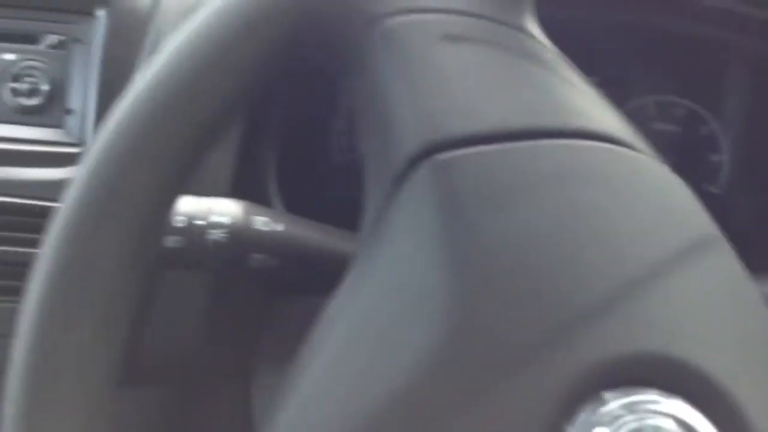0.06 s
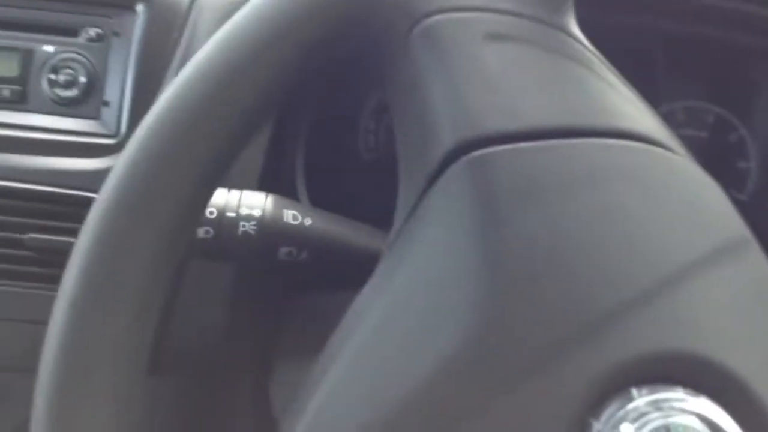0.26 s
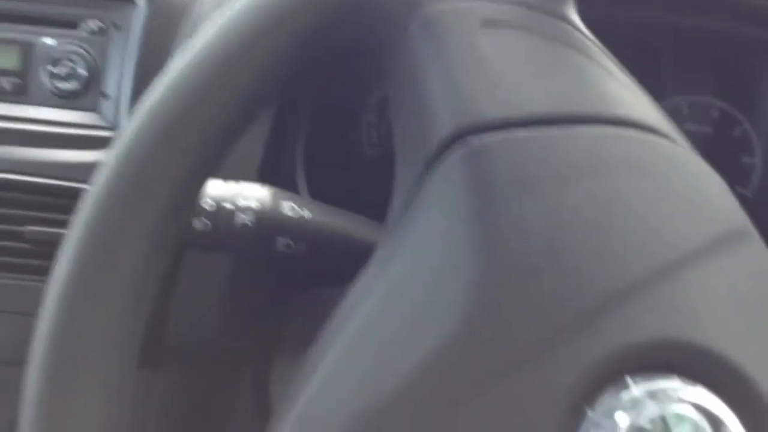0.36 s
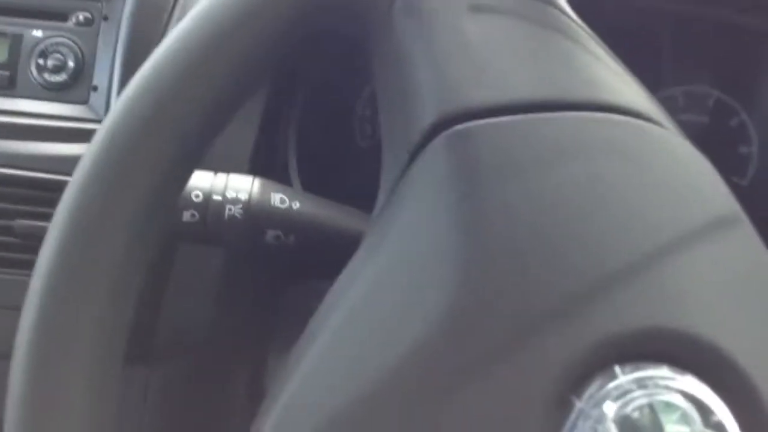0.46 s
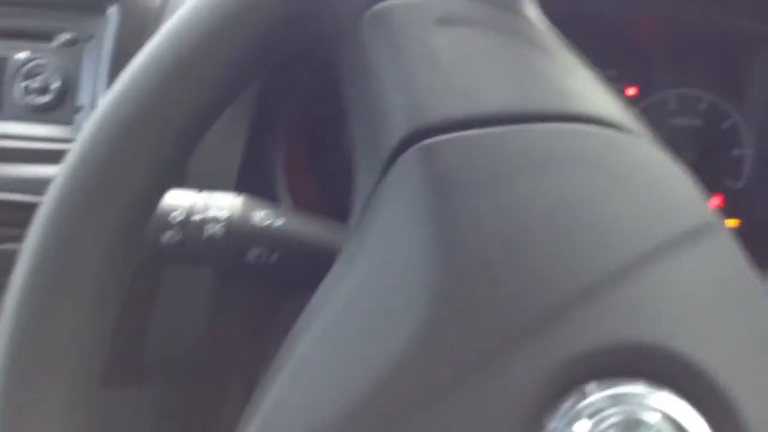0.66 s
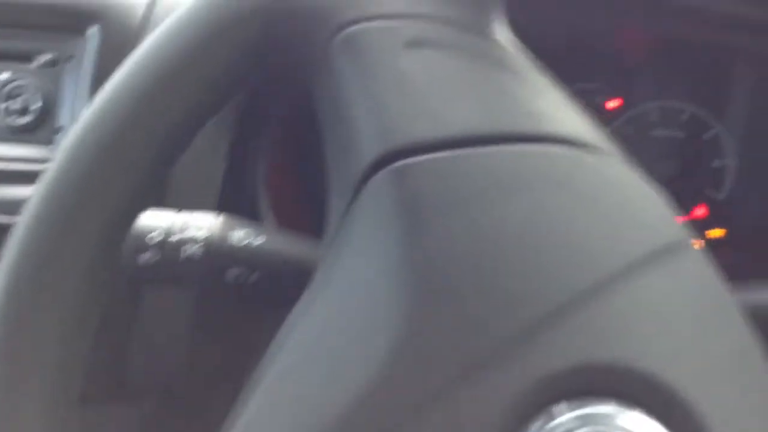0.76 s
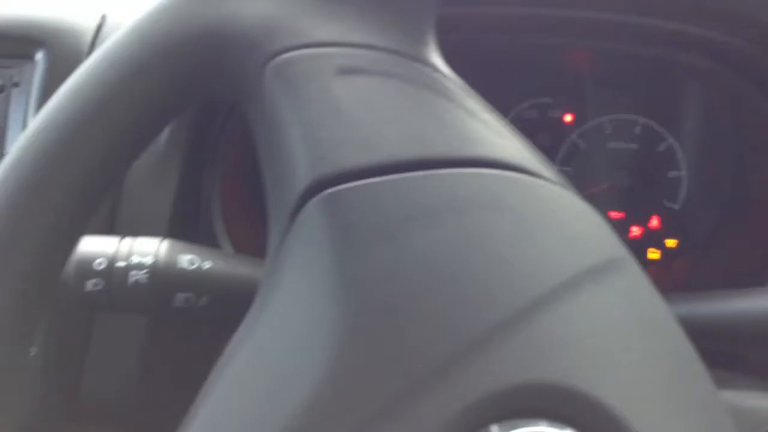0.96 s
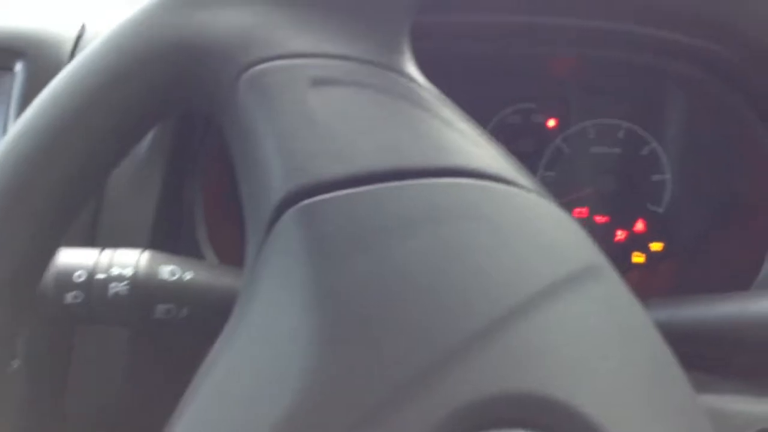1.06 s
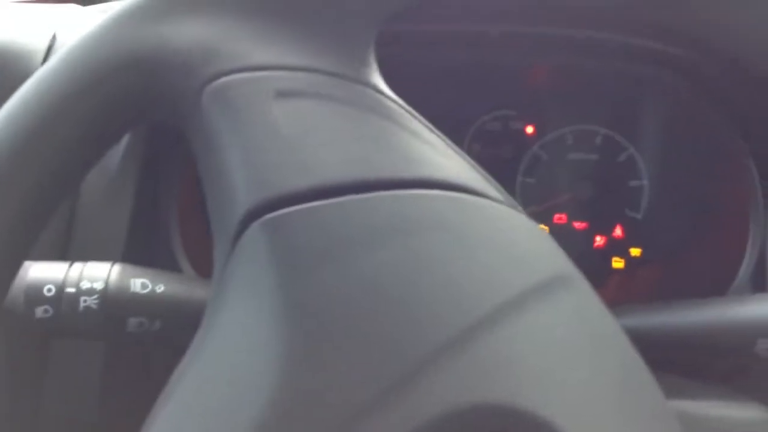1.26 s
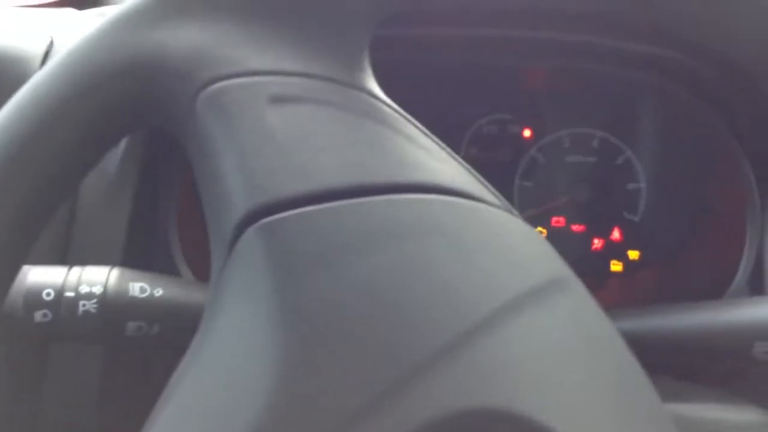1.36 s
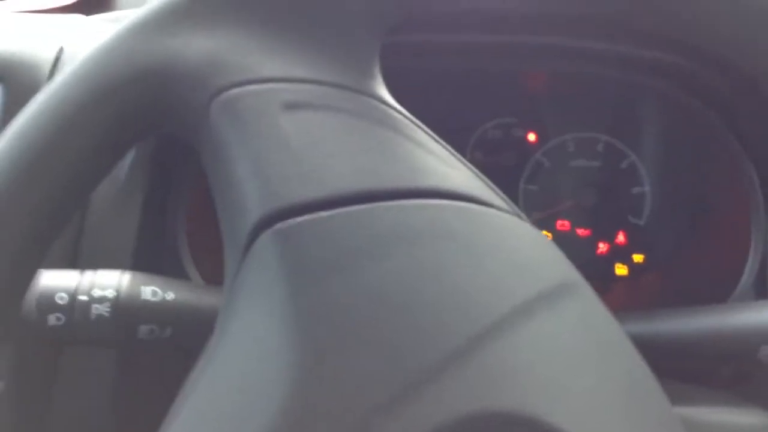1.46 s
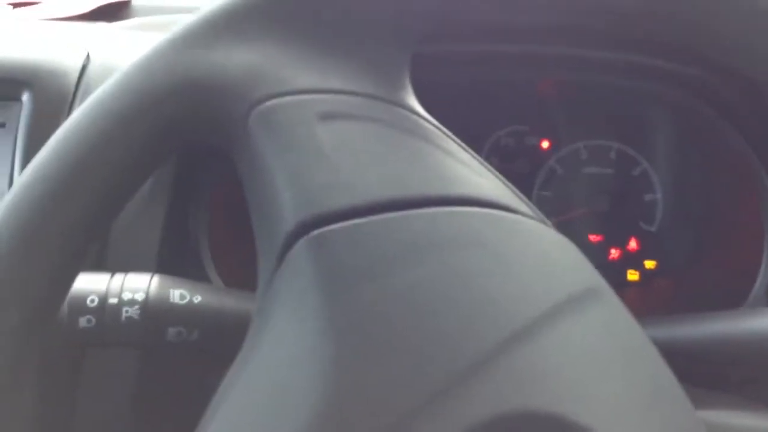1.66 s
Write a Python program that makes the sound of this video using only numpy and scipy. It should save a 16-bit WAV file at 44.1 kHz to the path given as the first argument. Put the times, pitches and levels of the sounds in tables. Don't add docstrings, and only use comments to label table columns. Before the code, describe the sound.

An ignition key is worked in its lock inside a parked van, heard close. Small rattling clicks from 0 to 0.18 seconds lead to a loud, bright metal snap at 0.2-0.25, with a springy knock near 0.38. Soft dashboard relay thumps cluster at 0.48-0.76; a faint low pump hum rises from 0.7. Key-ring ticks at 1.37 precede finger brushes until 1.7, over quiet rumble and hiss.

```python
import sys
import numpy as np
from scipy import signal
from scipy.fft import rfft, irfft
from scipy.io import wavfile
from scipy.ndimage import uniform_filter1d

SR = 44100
rng = np.random.default_rng(int(sys.argv[2]) if len(sys.argv) > 2 else 0)


def volts_from_db(level):
    exponent = np.asarray(level, float) / 20
    return 10 ** exponent


def waveform_to_disk(signal):
    frames = np.transpose(np.atleast_2d(signal))
    scaled = np.clip(frames, -1, 1) * 32767
    samples = np.round(scaled).astype(np.int16)
    wavfile.write(sys.argv[1], SR, samples)


N = 74970


def unit(x):
    return x / np.sqrt(np.mean(x ** 2))


def unit_energy(x):
    return x / np.sqrt(np.sum(x ** 2))


def add(out, x, start_s):
    i = int(round(start_s * SR))
    out[i:i + len(x)] += x[:len(out) - i]


def high_pass(x, hz):
    return signal.sosfilt(signal.butter(4, hz, "high", fs=SR, output="sos"), x)


def walk(rate_hz):
    k = int(SR / rate_hz)
    return unit(uniform_filter1d(uniform_filter1d(rng.standard_normal(N), k), k))


# f/Hz, level/dB per Hz
AIR = [(25, -34), (70, -16.5), (125, -3.5), (285, -6), (400, -10), (820, -16), (1330, -17.5), (2400, -23),
       (13600, -29)]
# f/Hz, width/Hz, level/dB rms
VENT = [(1242, 370, -64), (1920, 510, -69.5), (116.4, 17, -81)]


def air():
    f = np.maximum(np.fft.rfftfreq(N, 1 / SR), 1)

    def shaped_noise(gain):
        return unit(irfft(rfft(rng.standard_normal(N)) * gain, N))

    air_hz, air_db = np.array(AIR).T
    out = volts_from_db(-58.5) * shaped_noise(volts_from_db(np.interp(np.log(f), np.log(air_hz), air_db)))
    for hz, width_hz, db in VENT:
        resonance = 1 / (1 + (2 * (f - hz) / width_hz) ** 2)
        out = out + volts_from_db(db + 0.13 * walk(11)) * shaped_noise(resonance)
    return out


# harmonic number, level/dB rms
PUMP = [(1, -63.5), (2, -65.5), (3, -75), (4, -78.5)]
PUMP_HZ, PUMP_WOBBLE = 139.7, 0.0031
PUMP_ON_S, PUMP_RISE_S = 0.685, 0.16


def pump():
    t = np.arange(N) / SR
    phase = 2 * np.pi * np.cumsum(PUMP_HZ * (1 + PUMP_WOBBLE * walk(4.5))) / SR
    hum = np.zeros(N)
    for k, db in PUMP:
        hum += np.sqrt(2) * volts_from_db(db + walk(14)) * np.sin(k * phase)
    return hum * np.clip((t - PUMP_ON_S) / PUMP_RISE_S, 0, 1)


DETUNE, MODE_SCATTER_DB = 0.0045, 2
SWELL_S = 0.00025


def ring(modes, luck):
    hz, db, t60_s = np.array(modes).T[:, :, None]
    t = np.arange(int(.3 * SR)) / SR
    k = len(modes)
    hz = hz * (1 + DETUNE * luck[:k, None])
    decay = volts_from_db(db + MODE_SCATTER_DB * luck[k:2 * k, None] - 60 * t / t60_s)
    phase = 2 * np.pi * hz * t + 10 * luck[-k:, None]
    body = (decay * np.sin(phase)).sum(axis=0)
    return unit_energy(body * (1 - np.exp(-t / SWELL_S)))


# t/s, level/dB, push/ms, main panel level/dB re the rest
THUMPS = [(.001, -46.5, 0.47, 0), (0.059, -40, 4, -1), (0.139, -41, 1.1, -9), (0.23, -38, 1, 3),
          (0.319, -49, 2.8, -7), (0.48, -40.5, 1.44, -0.5), (0.489, -35, 0.96, 5), (.511, -41, 0.88, 3),
          (0.529, -34.5, 0.46, -10), (0.55, -42, 0.99, -8), (0.576, -37, 2.6, -14), (0.269, -33, 3.1, -11),
          (1.44, -41.5, 1.3, -10), (.6, -36.5, 1.05, -1.5), (0.612, -37, 0.66, -1.5),
          (0.628, -41.5, 0.75, -5), (0.652, -39, 0.76, -6), (0.682, -39.5, 2.9, -8), (0.707, -43, 0.6, -12),
          (0.725, -43, 2.1, -6), (.74, -44.5, .6, -17), (.758, -49, 1.4, -7)]
# f/Hz, level/dB, t60/s
DASH = [(105, -8, .1), (150, -3, .12), (190, -6, .09), (240, -4, .07), (405, -3, .06), (445, -2, .07),
        (490, -3, .07), (545, -4, .06), (610, -8, .05), (690, -7, .06)]
# f/Hz, level/dB, t60/s
PANEL = [(298, 0, .09)]
SHUDDER_S, SHUDDER_DB = .025, -5


def relay_thumps():
    out, t = np.zeros(N), np.arange(4000) / SR
    for s, db, push_ms, panel_db in THUMPS:
        push = np.sin(np.pi * np.clip(t[:400] / push_ms * 1000, 0, 1)) ** 2
        shake = rng.standard_normal(4000) * np.exp(-t / SHUDDER_S)
        shake = shake * volts_from_db(SHUDDER_DB) / np.sqrt(SHUDDER_S * SR / 2)
        shake[0] += 1
        force = signal.fftconvolve(shake, push / push.sum())
        dash = ring(DASH, rng.standard_normal(28))
        panel = ring(PANEL, 3 * rng.standard_normal(3))
        add(out, volts_from_db(db + 17.5) * signal.fftconvolve(force, dash + volts_from_db(panel_db) * panel), s)
    return high_pass(out, 112)


# f/Hz, level/dB, t60/s
SHROUD = [(270, -6, .04), (350, -3, .025), (440, -2, .022), (530, 1, .028), (620, -1, .022),
          (710, -4, .022), (790, -12, .02)]
CLICKS_PER_S, CLICK_SCATTER_DB, BIGGEST = 7000, 3.5, 2.2
FIRST_DB = 7.5
BRUSH_S, BRUSH_RISE = 0.015, 0.75
CRACK_HZ = 2500


def contacts(table, barrel, metal, crack_db, fade_db, top_hz, release_s):
    out, t = np.zeros(N), np.arange(2400) / SR
    crack_band = np.vstack([signal.butter(2, CRACK_HZ, "high", fs=SR, output="sos"),
                            signal.butter(2, top_hz, fs=SR, output="sos")])
    crack = unit_energy(signal.sosfilt(crack_band, 1. * (t == 0)))
    for s, length_s, db, metal_db, shroud_db in table:
        struck = rng.random(2400) < CLICKS_PER_S / SR
        size = np.minimum(rng.exponential(size=2400), BIGGEST)
        clicks = struck * np.sign(rng.standard_normal(2400)) * volts_from_db(CLICK_SCATTER_DB * size)
        clicks[0] = volts_from_db(FIRST_DB)
        if length_s > BRUSH_S:
            rise_s = BRUSH_RISE * (length_s - BRUSH_S) + 1e-9
            clicks = clicks * np.clip(t / rise_s + 0.39, 0, 1)
        release = np.clip((length_s - t) / release_s + 1, 0, 1)
        clicks = clicks * volts_from_db(fade_db * t / length_s) * release
        clicks = unit_energy(clicks) * np.sqrt(length_s * SR)

        luck = rng.standard_normal((3, 28))
        bright = ring(metal, luck[1])
        bright[:2400] += volts_from_db(crack_db) * crack
        body = ring(barrel, luck[0]) + volts_from_db(metal_db - 4.5) * bright
        body = body + volts_from_db(shroud_db) * ring(SHROUD, luck[2])
        add(out, volts_from_db(db) * signal.fftconvolve(clicks, body), s)
    return high_pass(out, 230)


# t/s, length/s, body level/dB, armature level/dB re body, shroud level/dB re body
TICKS = [
    (.609, 0.0037, -65, 7.5, -13),
    (.645, 0.0058, -56, 2, 1),
    (.656, 0.0046, -56, 1, 1),
    (.69, .003, -65, 2, -10),
]
# f/Hz, level/dB, t60/s
FOB = [(1050, -9, .01), (1360, -4, .012), (1750, -2, .012), (2060, 0, .014), (2300, -3, .01),
       (2900, -5, .01)]
# f/Hz, level/dB, t60/s
ARMATURE = [(5190, 0, .016), (6020, -2, .014), (6650, -4, .014), (7890, 0, .012), (8320, -1, .012),
            (10600, -9, .008)]


def relay_ticks():
    return contacts(TICKS, FOB, ARMATURE, crack_db=0.5, fade_db=-13, top_hz=10800, release_s=.004)


# t/s, length/s, fob level/dB, loop level/dB re fob, shroud level/dB re fob
RING = [
    (.487, 0.03, -59, -22, 3),
    (.792, 0.01, -65, -13, -26),
    (1.327, 0.028, -61, -2, -20),
    (1.348, 0.01, -65.5, -6, 8.5),
    (1.364, 0.002, -42, 6.5, -22),
    (1.368, 0.0047, -42.5, 3.5, -12),
    (1.373, 0.0022, -43.5, 3.5, -16),
    (1.378, 0.01, -57, 4.5, -6),
    (1.388, 0.014, -67, 10, -8),
]
# f/Hz, level/dB, t60/s
LOOP = [(3220, -5, .016), (3700, -8, .012), (4860, 0, .016), (5500, -9, .012), (6560, -3, .016),
        (8000, -5, .012), (9460, -4, .012), (10800, -3, .012), (13200, -11, .008)]


def key_ring():
    return contacts(RING, FOB, LOOP, crack_db=3.5, fade_db=-5.5, top_hz=13100, release_s=.004)


# t/s, length/s, body level/dB, loop level/dB re body, shroud level/dB re body
BRUSH = [
    (1.4155, 0.0045, -52, -5, -9),
    (1.429, 0.0084, -48.5, -2.5, -9.5),
    (1.44, 0.011, -46, -6.5, -9),
    (1.446, .01, -52, -8, -2.5),
    (1.455, 0.017, -55.5, 2, -2.5),
    (1.496, 0.01, -70.5, 7.5, -16),
    (1.556, 0.035, -62.5, -8, -5),
    (1.608, 0.037, -53.5, -4, -8.5),
    (1.652, 0.032, -53.5, -1, -11),
    (1.678, 0.024, -62, 3.5, -18),
]
# f/Hz, level/dB, t60/s
TUMBLER = [(1000, -6, .02), (1350, 0, .014), (1600, -5, .01), (1860, -1, .014), (2200, -4, .012),
           (2500, -7, .01), (2850, -8, .012), (3300, -14, .008)]
GRIP_DAMPS = .25


def finger_brush():
    def held(modes):
        return [(hz, db, t60_s * GRIP_DAMPS) for hz, db, t60_s in modes]

    return contacts(BRUSH, held([*TUMBLER, *FOB]), held(LOOP),
                    crack_db=3.5, fade_db=-6, top_hz=10200, release_s=0.015)


# t/s, length/s, latch level/dB, keys level/dB re latch, shroud level/dB re latch
SPRING = [
    (.379, 0.0045, -39, -16.5, -11),
    (.386, 0.018, -47.5, -24, -20),
]
# f/Hz, level/dB, t60/s
LATCH = [(651, 0, .045), (1000, -10, .02), (1330, -6, .025), (1740, -2, .03), (2060, -2, .025),
         (2390, -8, .014), (2950, -11, .012)]
# f/Hz, level/dB, t60/s
KEYS = [(2900, -4, .012), (3600, -4, .012), (4270, -1, .015), (4950, -4, .01), (5450, -6, .008),
        (6450, -8, .008), (7700, -10, .007), (9500, -12, .005)]


def spring_back():
    return contacts(SPRING, LATCH, KEYS, crack_db=-4, fade_db=-9, top_hz=5000, release_s=0.0054)


# t/s, length/s, tumbler level/dB, keys level/dB re tumbler, shroud level/dB re tumbler
LOCK = [(.0005, 0.0038, -47.5, -10, 1), (.0035, 0.015, -51, -3.5, -4.5), (.02, 0.028, -54.5, -10.5, -4),
        (.036, 0.014, -53.5, -8, 1), (.0545, 0.0038, -35.5, -12, -1.5), (.059, 0.0038, -36.5, -18, -11.5),
        (.068, 0.015, -50.5, -13, -2), (.088, 0.0088, -54, -12, 0), (.105, 0.0016, -37.5, -16, -16),
        (.1075, 0.0024, -36, -14.5, -13), (.113, 0.0043, -55, -1, -5), (.119, .008, -45, -16, -2),
        (.134, 0.0036, -40.5, -6, 3.5), (.141, 0.0073, -43.5, -10, -3), (.157, 0.0077, -57, -6, -6),
        (.181, 0.0085, -59, 2, 5), (.267, 0.007, -41.5, -13.5, -19), (.279, 0.006, -48.5, -6, -1),
        (.306, 0.013, -59, -7, 6), (.317, 0.013, -55.5, -29, 4.5)]


def lock_tumblers():
    return contacts(LOCK, TUMBLER, KEYS, crack_db=4, fade_db=-7, top_hz=4600, release_s=0.0077)


# t/s, length/s, pin level/dB, keys level/dB re pin, shroud level/dB re pin
PINS = [
    (.198, 0.013, -27.5, -7.5, -12),
    (.434, 0.0028, -59, -5, 9),
]
# f/Hz, level/dB, t60/s
PIN = [(1350, -14, .02), (1760, -7, .016), (2060, -3, .016), (2350, -2, .014), (2750, 1, .014),
       (3050, 0, .012), (3500, -5, .012)]


def lock_pins():
    return contacts(PINS, PIN, KEYS, crack_db=3, fade_db=-6, top_hz=6000, release_s=.005)


# t/s, length/s, barrel level/dB, blade level/dB re barrel, shroud level/dB re barrel
DETENT = [(.2118, 0.0019, -21, -1.5, -19), (.2145, 0.0038, -26, 1, -19), (.219, 0.0025, -22.5, 5, -19),
          (.2215, 0.0022, -15.5, -5, -12), (.2245, 0.0026, -16.5, -6.5, -15),
          (.229, 0.0025, -20.5, -8, -16), (.2325, 0.0034, -21.5, -10, -18.5), (.238, 0.0055, -33.5, -2, -8),
          (.243, 0.0074, -35.5, -10, -11), (.249, 0.0045, -36, -1.5, -8), (.256, 0.0094, -47, 0, -3)]
# f/Hz, level/dB, t60/s
BARREL = [(1000, -9, .016), (1175, -1, .025), (1265, -1, .025), (1385, -6, .025), (1720, -10, .02),
          (1845, 1, .025), (1940, 0, .022), (2035, 0, .022), (2250, -3, .02), (2400, -5, .016),
          (2750, -10, .014), (3050, -14, .012)]
# f/Hz, level/dB, t60/s
BLADE = [(3560, -4, .016), (4040, 2, .016), (4350, -6, .01), (4720, -4, .014), (4960, -6, .012),
         (5490, -9, .012), (6400, -10, .008), (8000, -10, .006), (10500, -12, .005)]


def detent_snap():
    return contacts(DETENT, BARREL, BLADE, crack_db=-0.5, fade_db=-4.5, top_hz=8500, release_s=0.002)


CABIN_T60_S, CABIN_DB, CABIN_HZ = .085, -15, 4050


def cabin(hits):
    t = np.arange(8000) / SR
    tail = signal.lfilter(*signal.butter(1, CABIN_HZ, fs=SR), rng.standard_normal(8000))
    tail = tail * volts_from_db(-60 * t / CABIN_T60_S) * (t > .002)
    return volts_from_db(CABIN_DB) * signal.fftconvolve(hits, unit_energy(tail))[:N]


def scene():
    floor = air() + pump()
    thumps = relay_thumps()
    hits = relay_ticks() + key_ring() + finger_brush() + spring_back()
    hits = hits + lock_tumblers() + lock_pins() + detent_snap()
    return (hits + cabin(hits) + thumps + floor)[None]


def low_pass(x):
    return signal.sosfilt(signal.butter(12, 16630, fs=SR, output="sos"), x)


def record(dry):
    mix = signal.sosfilt(signal.ellip(8, .2, 40, 15450, fs=SR, output="sos"), dry)
    return low_pass(mix)


dry = scene()
out = record(dry)
waveform_to_disk(out)
```